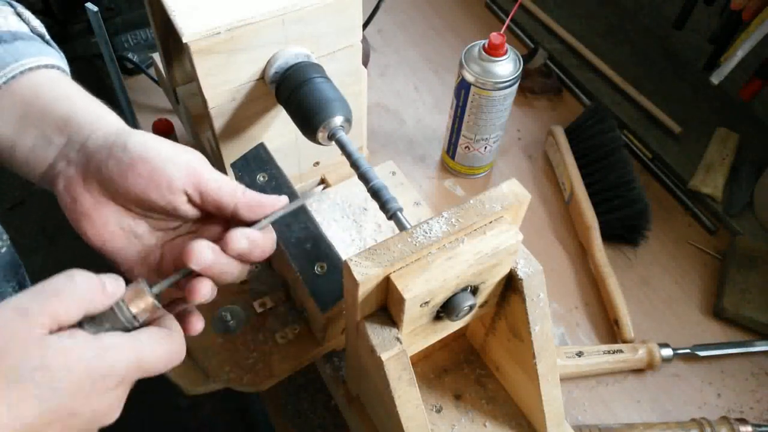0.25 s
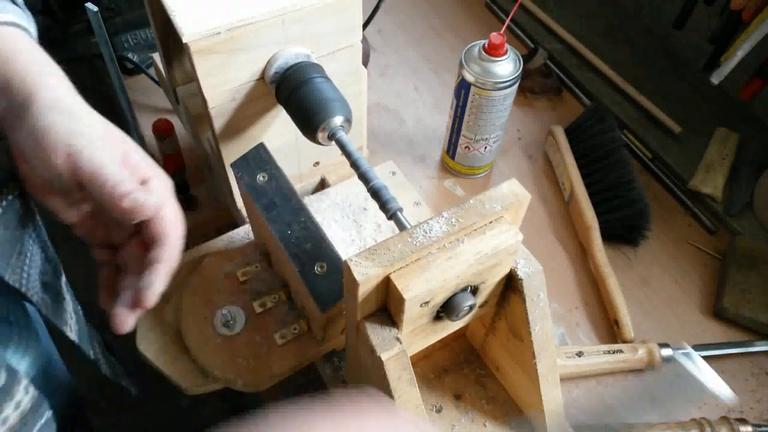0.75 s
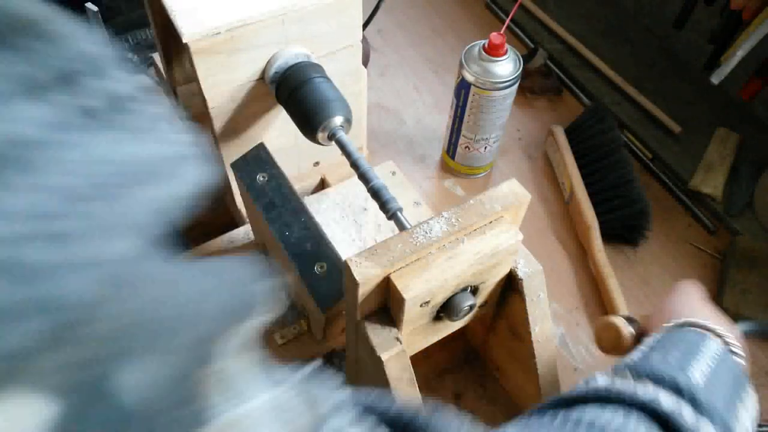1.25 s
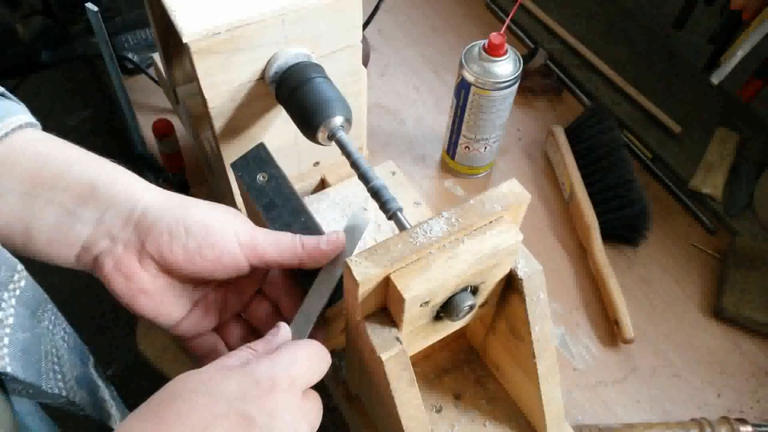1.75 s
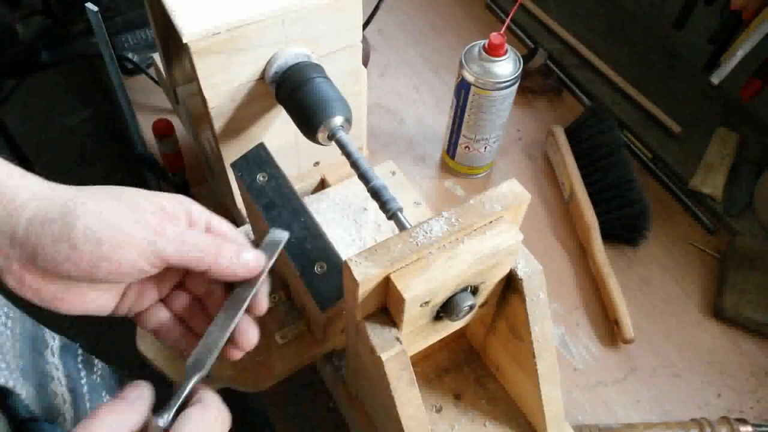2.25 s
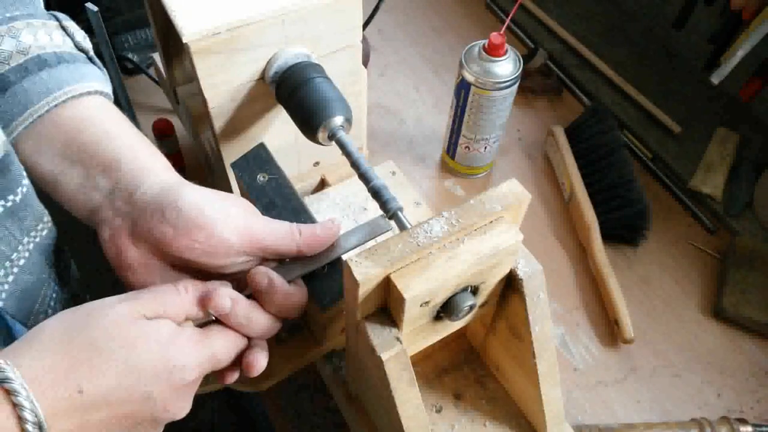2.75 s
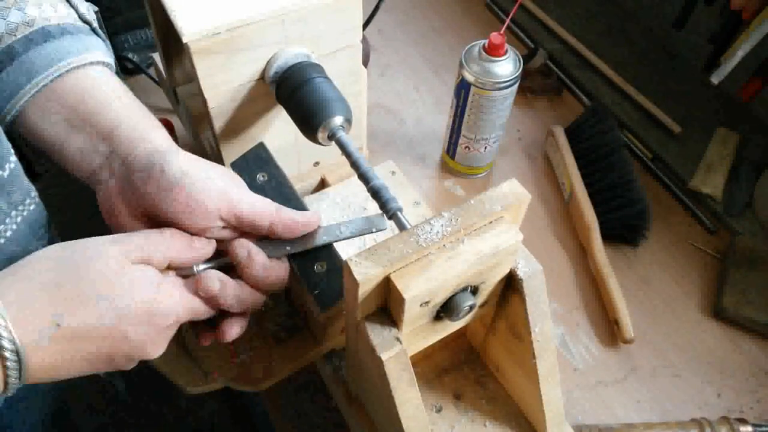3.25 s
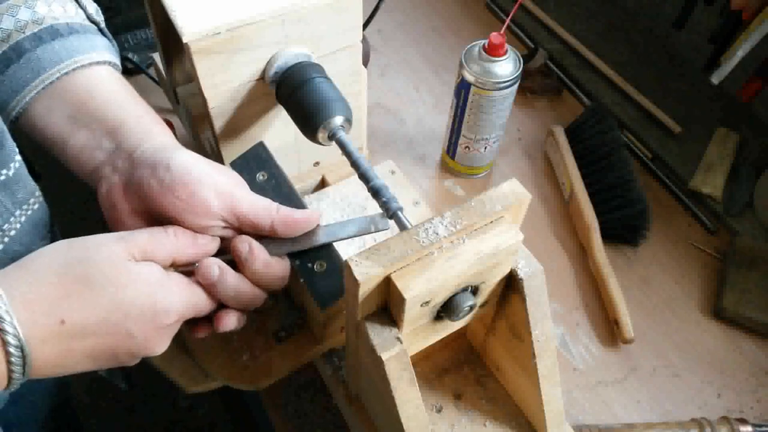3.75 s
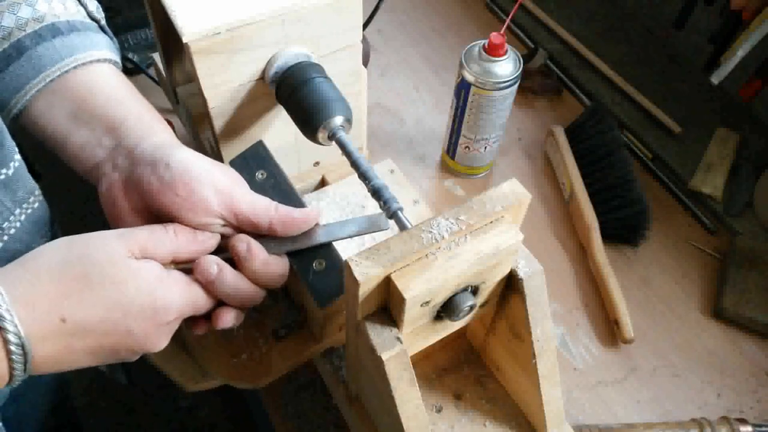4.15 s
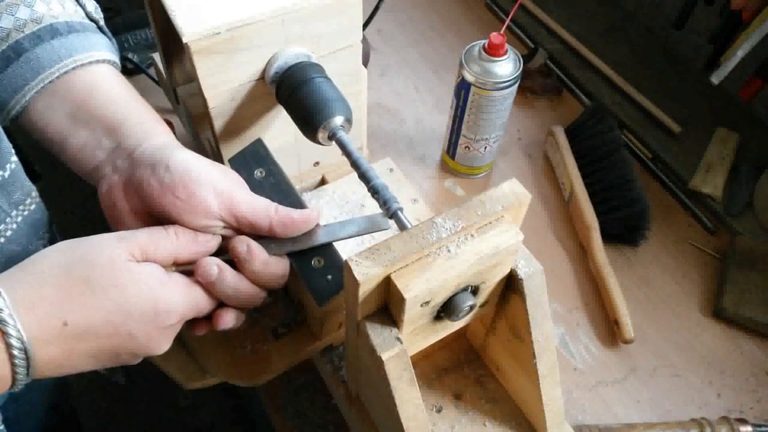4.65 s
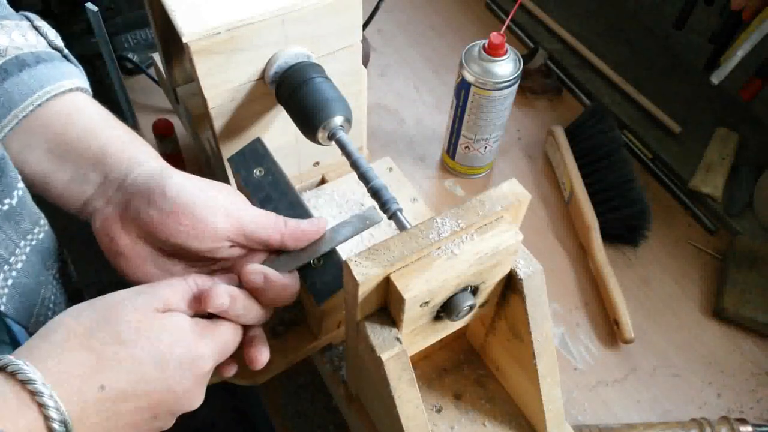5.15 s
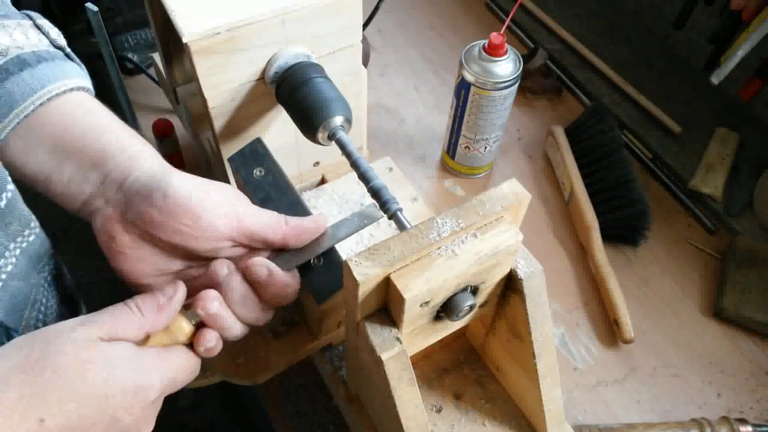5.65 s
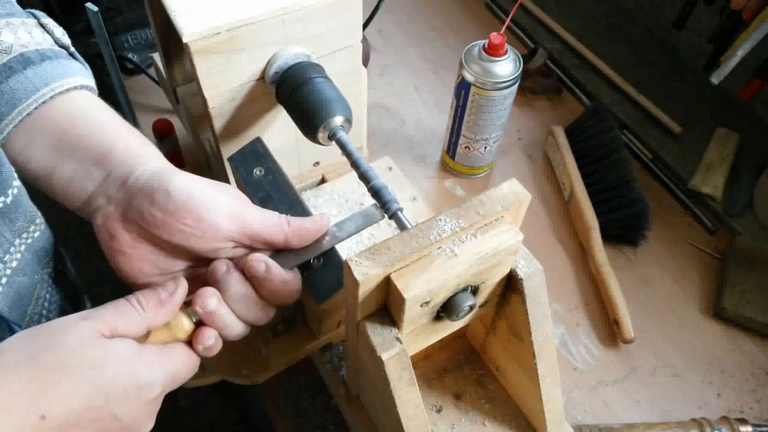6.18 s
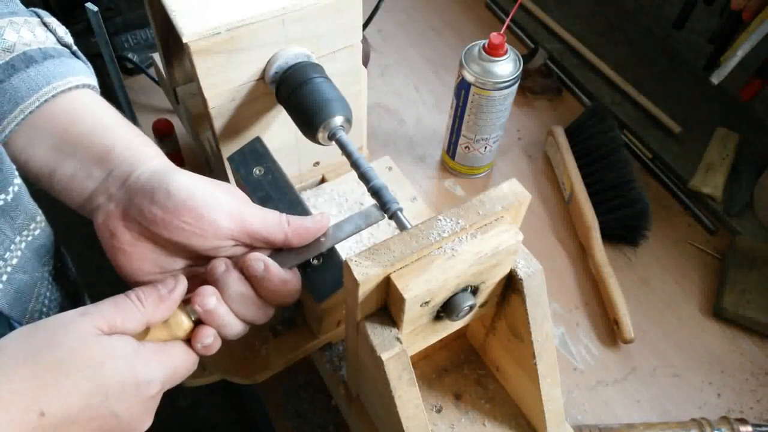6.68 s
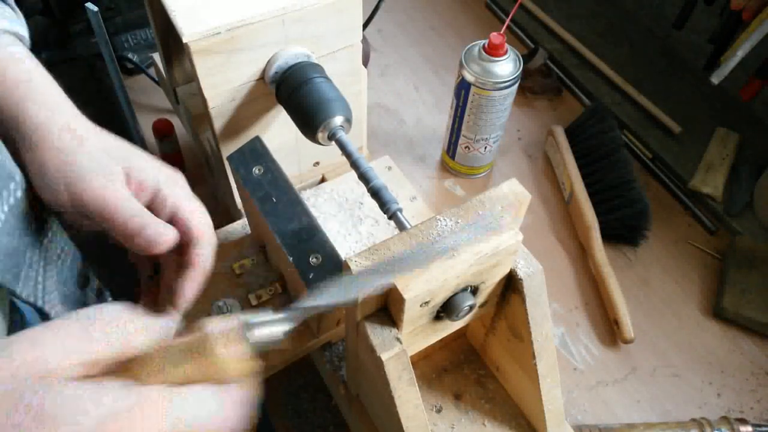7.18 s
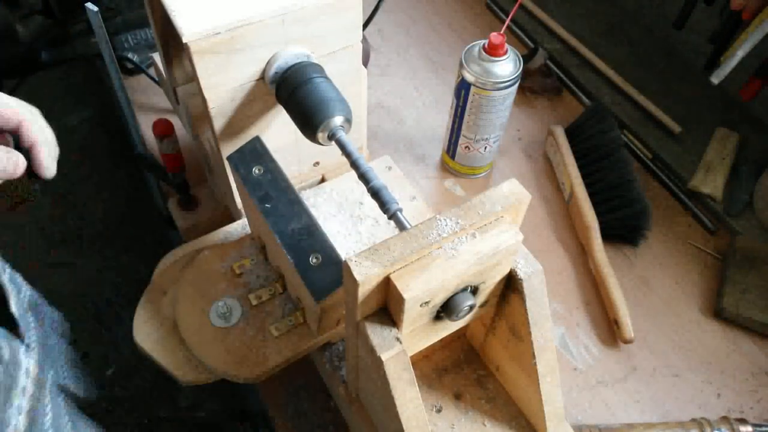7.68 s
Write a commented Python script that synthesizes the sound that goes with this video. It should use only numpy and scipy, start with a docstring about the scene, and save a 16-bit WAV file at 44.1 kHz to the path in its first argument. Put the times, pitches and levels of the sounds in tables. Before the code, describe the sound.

An electric drill runs close to the microphone, spinning a small workpiece in a wooden lathe frame with a high, steady whine and a fast gear rattle. After nearly three seconds a hand file presses on the work in four strokes, making a bright, steely rasp. Under each stroke the drill drops slightly in pitch and its gears go quieter. The file lifts near the end, and the full whine and rattle return.

```python
"""An electric drill spins a small workpiece in a wooden lathe frame, close to the microphone.
It first recovers from a load, then runs free: meshing teeth whine, and the loose gears rattle, with
four knocks a turn. From 2.7 s a hand file bears on the work in four strokes; stick-slip friction
rasps and rings its steel blade, while the load slows the drill a little and pulls its gears quiet.
After 7.1 s the file is off, and the whine and rattle return."""
import sys
import numpy as np
from scipy import signal
from scipy.fft import rfft, irfft, next_fast_len
from scipy.io import wavfile
from scipy.ndimage import uniform_filter1d

SR = 44100
rng = np.random.default_rng(int(sys.argv[2]) if len(sys.argv) > 2 else 0)


def inscribe(sig):
    """Save sig as 16-bit PCM at rate SR to the path in sys.argv[1].

    A 1-D sig is mono; a 2-D sig holds one channel per row.
    Samples are clipped to [-1, 1] before scaling.
    """
    pcm = np.round(np.clip(np.atleast_2d(sig).T, -1, 1) * 32767)
    wavfile.write(sys.argv[1], SR, pcm.astype(np.int16))


N = 349263
T = np.arange(N) / SR
HZ = np.fft.rfftfreq(next_fast_len(N), 1 / SR)

# Gear tones that go with the mesh tone, and with its octave.
# Each row: multiple of the spindle speed, relative level in dB.
MESH_TONES = [(38, -22.5), (42, 0.5), (46, -16), (50, -17.5), (126, -9.5), (168, -12.5)]
OCTAVE_TONES = [(80, -21), (84, 3.5), (88, -13), (92, -17), (100, -8.5)]
# Speed of the unloaded drill. Each row: time in seconds, mesh frequency in Hz.
FREE_SPEED = [(0, 1608), (1.5, 1607.5), (2.1, 1600), (2.45, 1610), (7.92, 1616)]
# The frame's buzz while the gears are loose. Each row: time in seconds, gain of the buzz band in dB.
BUZZ_GAIN = [(0, 0), (.85, 1), (1.02, 3), (1.38, 2), (1.5, -1.5), (1.8, -0.1), (2.7, -1), (5.25, 1),
             (5.7, -.5), (7.15, -1), (7.4, -1), (7.9, 1.2)]
# File strokes. Each row: start in seconds, end in seconds, full drag on the mesh tone in Hz,
# relative base level in dB, growth over the stroke in dB, place from 0 (mid blade) to 1 (near the tip).
STROKES = [(2.725, 3.093, 38, -31.5, 3.5, 0.51), (3.412, 4.93, 38, -30, 2.5, 0.11),
           (5.749, 6.409, 18.5, -30.5, -1, 0.86), (6.456, 7.068, 17.5, -32, 2, 0.49)]
# Broad spectra of the drill body with its frame, and of the file at mid blade and near the tip.
# Each row: frequency in Hz, relative spectral density in dB.
BODY_SPECTRUM = [(130, -35.5), (220, -19.5), (300, -20), (600, -16.5), (1200, -12), (1700, -5.5),
                 (2350, -6), (2750, 1.5), (3500, 1), (4100, -5), (7000, -8), (8500, -6.5), (10000, -8),
                 (15800, -13.5)]
MID_SPECTRUM = [(100, -29), (400, -16), (750, -7.5), (1200, -14.5), (1700, -7), (3000, -8.5), (4300, -0.5),
                (5800, -4), (7500, -3.5), (10000, -0.5), (13000, 0), (14700, 1.5), (15800, -11)]
TIP_SPECTRUM = [(100, -7), (400, -6.5), (750, -8.5), (1200, -6), (1700, -29), (3000, -3.5), (4300, 6),
                (5800, -4.5), (7500, 3.5), (10900, 3.5), (12400, 5), (14400, -9.5), (15800, 3.5)]
# Resonances of the body and of the steel blade.
# Each row: frequency in Hz, width in Hz, height over the broad spectrum in dB.
BODY_MODES = [(282.4, 38.5, 6.8), (383, 18, 7.4), (450, 2.5, 12.3), (595, 26, 4), (766, 57, 6.5),
              (1016, 11.3, 8.4), (1139, 18, 5.2), (2656, 11.5, 8.3), (2814, 8.2, 5.7), (3656, 29, 6.6),
              (4540, 350, 4.2), (5560, 180, 2.9), (6080, 160, 4.8), (6630, 75, 2.8), (6600, 99, 2.7),
              (7620, 160, 1.6), (10660, 200, 2.5), (11760, 700, 4.2), (14400, 260, 2.4)]
BLADE_MODES = [(2090, 200, 4), (4100, 400, 5), (4550, 160, 4), (7650, 250, 3), (8400, 400, 3),
               (8660, 280, 8), (9560, 240, 3), (11480, 330, 6), (15300, 400, 2)]
# Likeness of the two channels. Each row: frequency in Hz, left-right correlation from -1 to 1.
BODY_CORRELATION = [(30, 0.88), (250, 0.72), (600, 0.86), (1900, 0.7), (2450, 0.62), (2800, 0.63),
                    (3700, 0.66), (5000, 0.43), (6800, 0.17), (8100, 0.19), (9400, 0.39), (11000, 0.74),
                    (15800, 0.097)]
BLADE_CORRELATION = [(100, 0.53), (4000, 0.49), (5000, 0.063), (7000, 0.27), (8600, 0.64), (11000, 0.63),
                     (11700, -0.13), (13100, -0.053), (14700, 0.3), (15500, 0.018)]
# Stereo balance of body, mid blade and tip. Each row: frequency in Hz, left minus right in dB.
BODY_BALANCE = [(30, -7), (1000, 0.5), (2100, -0.5), (2500, -2.5), (3000, -1), (5500, 2), (6100, 2.5),
                (6600, 2), (7800, 0), (8500, 1), (9200, 0), (15800, 1.5)]
MID_BALANCE = [(100, 13), (3500, -1.5), (7500, -0.5), (12000, 0.5), (13700, 2), (15800, -3)]
TIP_BALANCE = [(100, 0), (7700, 0), (8250, -6), (8900, -6), (9250, 0), (11400, -3), (12200, -0.5),
               (15800, 0)]
# Notches of the microphone ports. Each row: frequency in Hz, width in Hz, gain in dB.
PORT_DIPS = [(4760, 630, -2), (6700, 200, -2), (8030, 240, -2.5), (11260, 1560, -5)]

TEETH, KNOCKS_PER_TURN = 42, 4


def gear_whine(turns, tones, level_db, flutter, flutter_hz, spread_rad):
    """Periodic tooth contact radiates harmonics of the spindle speed, each modulated at random."""
    sound = np.zeros((2, N))
    for order, db in tones:
        tone = amp(db) * waver(flutter, flutter_hz) * np.exp(2j * np.pi * order * turns)
        sound += [tone.real, (tone * np.exp(1j * spread_rad)).real]
    return np.sqrt(2) * amp(level_db) * sound


def gear_rattle(turns, level_db, tight, knock_loose=0.26, knock_tight=0.76):
    """Forced vibration: gear chatter, brushes and cooling air excite the modes of drill and frame."""
    force = 1 + (knock_loose * (1 - tight) + knock_tight * tight) * knocks(turns)
    body = response(BODY_SPECTRUM, BODY_MODES)
    sound = radiate(force, body, BODY_CORRELATION, BODY_BALANCE, band_hz=(2450, 3900))
    treble = filtered(sound, 1 - lowpass(4600, slope=8))
    treble_gain = amp(3 - 0.2 * tight + 0.5 * wander(21))  # the treble flickers
    buzz = filtered(sound, bandpass(3050, width_hz=1500))
    buzz_gain = amp(time_curve(BUZZ_GAIN) * (1 - tight))
    return amp(level_db) * (sound + (treble_gain - 1) * treble + (buzz_gain - 1) * buzz)


def file_rasp(turns, pressure, tip, chatter=0.65, trim_db=-0.33, band_hz=(8000, 15500)):
    """Stick-slip friction rings the blade; near the tip it also chatters with the spindle's knocks."""
    grip = flicker(db=2, rate_hz=71) * flicker(db=4, rate_hz=1150)  # a tooth can only grab so hard
    at_mid = radiate(grip, response(MID_SPECTRUM, BLADE_MODES), BLADE_CORRELATION, MID_BALANCE, band_hz)
    jolts = grip * (1 + chatter * knocks(turns))
    at_tip = radiate(jolts, response(TIP_SPECTRUM, BLADE_MODES), BLADE_CORRELATION, TIP_BALANCE, band_hz)
    sound = amp(trim_db) * pressure * (np.sqrt(1 - tip) * at_mid + np.sqrt(tip) * at_tip)
    low = filtered(sound, lowpass(1400, slope=8))
    bursts = unit_rms(flicker(db=4, rate_hz=54) * flicker(db=3.5, rate_hz=9))
    scrape = filtered(sound, bandpass(3920, width_hz=1800))
    flares = unit_rms(flicker(db=2.5, rate_hz=35))  # this band flares as the teeth grab
    return sound + (bursts - 1) * low + (flares - 1) * scrape


def steel_ticks(turns, level_db):
    """A brief impact has a bright spectrum: steel meets steel at each knock of the spindle."""
    size = flicker(db=3, rate_hz=76) * flicker(db=6, rate_hz=6)
    impacts = size * pulses(turns, decay_cycles=0.045) * rng.standard_normal(N)
    return amp(level_db) * unit_rms(filtered(impacts, bandpass(9700, width_hz=5500, slope=2)))


def motor_hum(turns, level_db, mesh_ratio=3 / 8):
    """Rotation gives a low motor tone, locked at a fixed ratio to the mesh frequency."""
    tone = waver(0.26, rate_hz=20) * np.exp(2j * np.pi * mesh_ratio * TEETH * turns)
    return np.sqrt(2) * amp(level_db) * tone.real


def low_bursts(envelope, mean_per_s=56, relative_db=-31):
    """A Poisson process of varying rate: faint clumped bursts of low noise burble during the strokes."""
    rate = mean_per_s * unit_rms(flicker(db=5, rate_hz=4))
    onsets = rng.random(N) < rate / SR
    sizes = np.sign(rng.standard_normal(N)) + rng.standard_normal((2, N))  # shared + per channel
    return amp(relative_db) * envelope * unit_rms(filtered(onsets * sizes, lowpass(1100)))


def gear_tightness(bite_s=0.083, slacken_s=0.35):
    """Load takes up backlash quickly and lets it return slowly: 0 is loose, 1 is tight."""
    held = [np.minimum((T - on) / bite_s, 1 - (T - off) / slacken_s) for on, off, *_ in STROKES]
    opening_load = 0.38 * (1 - T / 0.31)
    return np.clip(np.max(held + [opening_load], axis=0), 0, 1)


def mesh_frequency(lag_s=0.178, opening_sag_hz=31.86):
    """Inertia makes the speed follow the drag of each stroke with a first-order lag."""
    drag = sum(drag_hz * (T > on) * (T < off) for on, off, drag_hz, *_ in STROKES)
    pole = np.exp(-1 / (lag_s * SR))
    sag = signal.lfilter([1 - pole], [1, -pole], drag) + opening_sag_hz * np.exp(-T / lag_s)
    return time_curve(FREE_SPEED) - sag


def file_contact(press_s=0.075, lift_s=0.039, unsteady_db=0.8):
    """Contact force sets the friction's amplitude; returns that pressure and its place on the blade."""
    pressure, tip = np.zeros(N), np.zeros(N)
    for on, off, _, db, growth_db, place in STROKES:
        touching = np.clip(np.minimum((T - on) / press_s, 1 - (T - off) / lift_s), 0, 1)
        progress = np.clip((T - on) / (off - on), 0, 1)
        pressure += touching * amp(db + growth_db * (progress + 0.5))
        tip[T >= on] = place
    return pressure * amp(unsteady_db * wander(7)), tip


def knocks(turns):
    """Periodic impacts of uneven strength, one at each quarter turn."""
    return (1 + np.tanh(wander(51))) * pulses(turns, decay_cycles=0.08)


def pulses(turns, decay_cycles):
    """Exponential decay, restarted at each knock of the spindle."""
    return np.exp(-(turns * KNOCKS_PER_TURN % 1) / decay_cycles)


def radiate(force, gain, correlation, balance, band_hz):
    """Countless tiny impacts sum to noise that rings a body; the stereo level is normalised in a band."""
    common, apart = rng.standard_normal((2, N)) * unit_rms(force)
    likeness = frequency_curve(correlation)
    mid, side = gain * np.sqrt((1 + likeness) / 2), gain * np.sqrt((1 - likeness) / 2)
    band_rms = np.sqrt(np.mean(mid ** 2 * (HZ > band_hz[0]) * (HZ < band_hz[1])))
    sign = np.array([[1], [-1]])
    pan = amp(sign * frequency_curve(balance) / 2)
    return (filtered(common, mid * pan) + sign * filtered(apart, side * pan)) / band_rms


def response(spectrum, modes):
    """Resonances add in power, as Lorentzian peaks on a broad spectrum."""
    peaks = sum((amp(db) ** 2 - 1) * bandpass(hz, width, slope=2) for hz, width, db in modes)
    return amp(frequency_curve(spectrum)) * np.sqrt(1 + peaks)


def wander(rate_hz):
    """Low-passed Gaussian noise of unit rms."""
    return unit_rms(filtered(rng.standard_normal(N), lowpass(rate_hz)))


def flicker(db, rate_hz):
    """Random amplitude modulation, bounded at plus and minus db."""
    return amp(db * np.tanh(wander(rate_hz)))


def waver(depth, rate_hz):
    """Random modulation of amplitude and phase, as a complex gain."""
    return 1 + depth * (wander(rate_hz) + 1j * wander(rate_hz))


def lowpass(corner_hz, slope=4):
    """Gain that falls as a power of frequency above the corner."""
    return 1 / (1 + (HZ / corner_hz) ** slope)


def bandpass(centre_hz, width_hz, slope=4):
    """Bell-shaped gain, one half at the edges of the band."""
    return 1 / (1 + (2 * (HZ - centre_hz) / width_hz) ** slope)


def filtered(x, gain):
    """Linear filtering by multiplication of the spectrum."""
    size = next_fast_len(N)
    return irfft(rfft(x, size) * gain, size)[..., :N]


def frequency_curve(rows):
    """Interpolation on a log-frequency axis."""
    hz, value = np.transpose(rows)
    return np.interp(np.log(HZ + 1), np.log(hz), value)


def time_curve(rows):
    """Linear interpolation in time."""
    return np.interp(T, *np.transpose(rows))


def amp(db):
    """Decibels to amplitude ratio."""
    return 10 ** (np.asarray(db) / 20)


def unit_rms(x):
    """Normalisation to unit power."""
    return x / np.sqrt(np.mean(x ** 2) + 1e-20)


def scene(jitter=0.00156, fade_db_per_hz=0.49):
    """Superposition of drill and file, coupled through the one spindle that the file loads."""
    tight, mesh_hz = gear_tightness(), mesh_frequency()
    pressure, tip = file_contact()
    sway_db = 0.48 * wander(9)  # the drill never runs quite evenly
    rattle_db = -25.5 - 9.5 * tight + sway_db
    fade_db = fade_db_per_hz * np.minimum(mesh_hz - 1609, 0)  # the mesh tone fades as its pitch sags
    mesh_db = -28.5 - 11.5 * tight + fade_db + sway_db
    turns = np.cumsum(mesh_hz * (1 + jitter * wander(25))) / TEETH / SR
    mesh = gear_whine(turns, MESH_TONES, mesh_db, flutter=0.12, flutter_hz=25, spread_rad=0.15)
    octave = gear_whine(turns, OCTAVE_TONES, rattle_db - 8, flutter=0.23, flutter_hz=11, spread_rad=0.069)
    hum = motor_hum(turns, level_db=-46 - 10.5 * tight)
    rattle = gear_rattle(turns, rattle_db, tight)
    ticks = steel_ticks(turns, rattle_db - 8.5)
    return mesh + octave + hum + rattle + ticks + file_rasp(turns, pressure, tip) + low_bursts(pressure)


def noise_gate(x, threshold_db=-6.3, bass_cut_db=4, cut_db=24):
    """Spectral gating: patches below 1400 Hz shut when well under the hiss, so the lows come in bursts."""
    frames = dict(fs=SR, nperseg=512, noverlap=384)
    hz, _, spectra = signal.stft(x, **frames)
    power = (abs(spectra) ** 2).mean(0)
    hiss = uniform_filter1d(power[(hz > 10000) & (hz < 15800)].mean(0), size=20)
    patch = uniform_filter1d(uniform_filter1d(power, size=3, axis=0), size=4, axis=1)
    over_db = 10 * np.log10(abs(patch / (hiss + 1e-16)) + 1e-16) - threshold_db
    shut = (1 - np.tanh(2 * over_db)) / 2
    depth_db = np.interp(hz, [0, 300, 1300, 1400], [bass_cut_db, cut_db, cut_db, 0])
    return signal.istft(spectra * amp(-depth_db[:, None] * shut), **frames)[1][:, :N]


def record(dry, edge_hz=15800):
    """Stages in cascade: the notches of the microphone ports, the noise gate, then the band limit."""
    dips_db = sum(db * bandpass(hz, width, slope=2) for hz, width, db in PORT_DIPS)
    gated = noise_gate(filtered(dry, amp(dips_db)))
    band_limit = signal.firwin(1023, edge_hz, window=("kaiser", 9), fs=SR)
    return signal.oaconvolve(gated, band_limit[None], "same")


dry = scene()
out = record(dry)
inscribe(out)
```